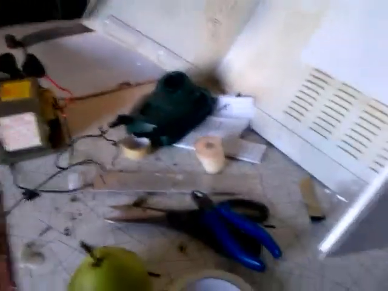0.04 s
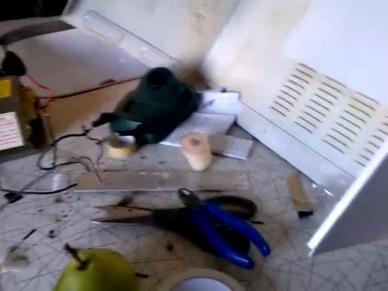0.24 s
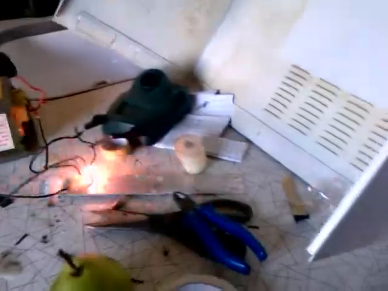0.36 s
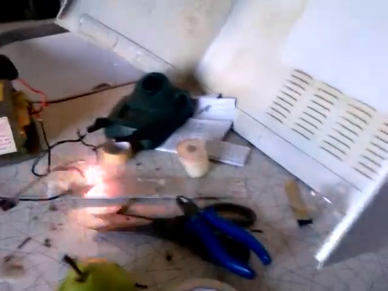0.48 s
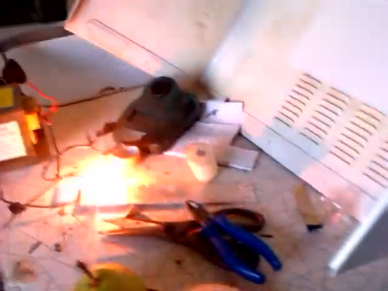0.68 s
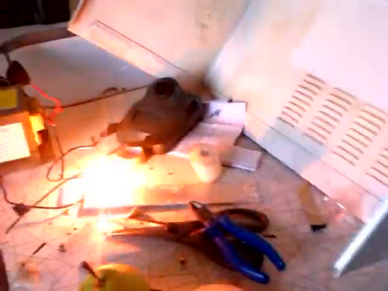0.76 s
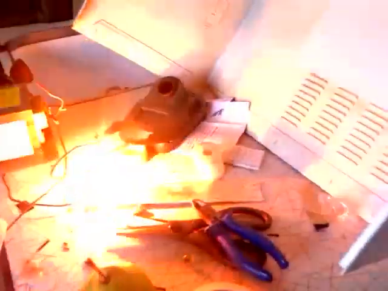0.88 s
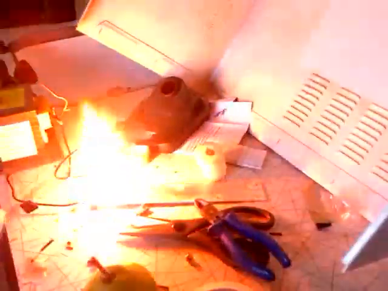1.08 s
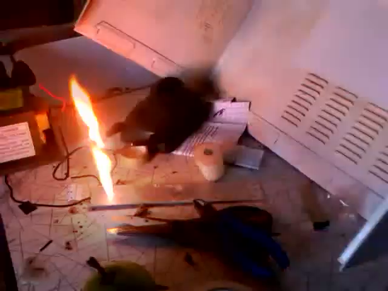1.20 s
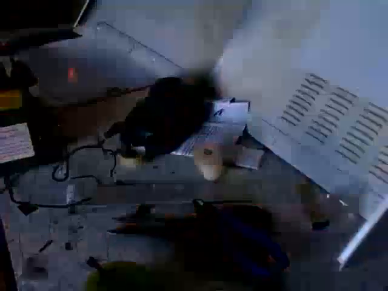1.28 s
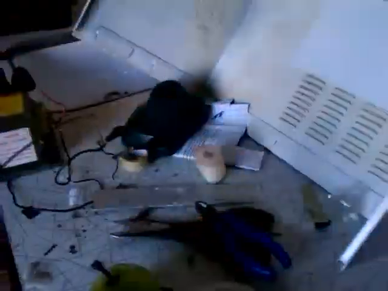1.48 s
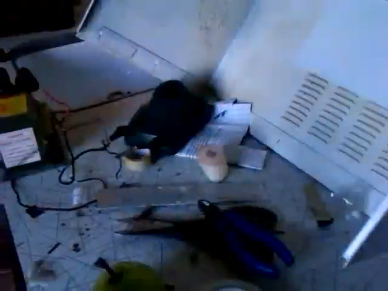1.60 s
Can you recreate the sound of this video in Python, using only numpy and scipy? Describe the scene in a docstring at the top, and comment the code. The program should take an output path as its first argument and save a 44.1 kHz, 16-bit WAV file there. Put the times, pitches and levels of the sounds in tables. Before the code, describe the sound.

An electric arc buzzes close by on a workbench in a small room. Over a faint whine, a switch clacks and rattles at 0.2 seconds. At 0.4 the arc strikes with a bright snap, buzzing harshly and spitting sparks. Another clack comes at 0.8 as it swells into a humming roar. Rapid sharp cracks run from 1.1 until it dies at 1.3 with a low puff, the hum fading briefly.

```python
"""A small room, close to a workbench with a high-voltage arc. Over a faint whine a switch clacks and
rattles, then the arc strikes with a bright snap. It re-ignites in every half-cycle, so it buzzes at
twice the mains rate, spitting sparks. It swells into a humming, roaring flame, cracks on about every
other half-cycle as it stretches, and goes out with a low puff; the room rings on briefly."""
import sys
import numpy as np
from scipy import signal
from scipy.fft import rfft, irfft, next_fast_len
from scipy.io import wavfile

SR = 44100
rng = np.random.default_rng(int(sys.argv[2]) if len(sys.argv) > 2 else 0)


def int16_out(signal):
    """Quantize to a 16-bit WAV file."""
    q = np.round(np.clip(np.atleast_2d(signal).T, -1, 1) * 32767)
    wavfile.write(sys.argv[1], SR, q.astype(np.int16))


N = 72765

# The bed of room noise. Each row: frequency in Hz, relative level in dB.
ROOM_TONE_EQ = [(15, 16), (25, -8.5), (108, -4.5), (157, -9), (195, -4.5), (463, -5.5), (775, -11.5),
                (1940, -18), (2610, -14.5), (3160, -18.5), (5730, -21), (13200, -32), (16000, -115)]
# Thin tones in that bed. Each row: pitch in Hz, level in dB.
WHINE_TONES = [(2573, -70), (5642, -68)]
# Clacks of switch and apparatus. Each row: start in seconds, level in dB, tilt in dB per octave.
CLACK_HITS = [(0.2201, -3, 2), (.2415, -15, 7), (.304, -11, 1.5), (0.4116, -3, 3), (.8295, -3.5, 1)]
# The rattle after the first clack. Each row: time in seconds, level in dB.
RATTLE_FADER = [(.222, -29.5), (.26, -38), (.305, -33), (.33, -42), (.37, -42.5), (.41, -52)]
# The switch's ringing metal. Each row: pitch in Hz, width in Hz, relative level in dB.
SWITCH_MODES = [(585, 167, -6), (798, 100, -0.5), (1205, 280, -3), (1960, 220, -6), (2930, 280, -2.5),
                (3790, 117, 3.5), (5020, 150, -9.5), (5800, 140, -8), (7110, 103, 1.5), (8660, 31, -5),
                (11080, 150, -19)]
# The room's tail. Each row: frequency in Hz, seconds to fall 60 dB.
ROOM_DECAY = [(150, 0.72), (320, 0.34), (1000, 0.49), (6000, 0.38), (14000, 0.37)]
# The first spark's bright tone. Each row: frequency in Hz, relative level in dB.
SNAP_EQ = [(1000, -29), (3500, 7), (5000, -14), (6800, 7), (8500, -4), (12000, -16), (14500, -5),
           (15800, -9)]
# The re-ignition buzz. Each row: multiple of twice the mains rate, relative level in dB.
BUZZ_PARTIALS = [(1, -16.5), (2, -16), (3, -6.5), (4, -16), (5, -40), (6, -6), (7, -9), (8, -9.5),
                 (9, -11.5), (10, -3), (11, -0.5), (12, 5), (13, 4), (14, -0.5), (15, 2), (16, 2.5),
                 (17, 2), (18, 4.5), (19, -6), (20, 0.5), (21, -1.5)]
# The buzz's rise and fall. Each row: time in seconds, level in dB.
BUZZ_FADER = [(.41, -45), (.46, -40), (.55, -39), (.9, -38.5), (1.05, -38), (1.15, -42.5), (1.3, -51)]
# The sparks' ebb and flow. Each row: time in seconds, level in dB.
SPARK_FADER = [(.41, -37.5), (.44, -34), (.48, -34), (.52, -39), (.58, -41.5), (.65, -38), (.73, -41.5),
               (.81, -37.5), (.85, -33), (.92, -35), (.96, -32), (1.02, -30.5), (1.06, -32), (1.12, -35.5),
               (1.2, -36), (1.31, -34.5)]
# The sparks' sizzle. Each row: frequency in Hz, relative level in dB.
SPARK_EQ = [(400, -24.5), (1500, -12), (2600, -13.5), (3600, -5.5), (5000, -3.5), (6000, -4.5), (6600, 1),
            (7400, -1), (8100, -8), (9500, -9), (12000, -20.5), (14000, -20), (15800, -23)]
# The flame's swell. Each row: time in seconds, roar level in dB, growl level in dB.
FLAME_FADERS = [(.5, -60, -79), (0.701, -51.5, -58), (.82, -39, -48), (.92, -48, -44.5), (1.03, -48, -37),
                (1.09, -30, -36), (1.16, -33, -29), (1.22, -34, -28), (1.3, -33.5, -35)]
# The flame's overtones. Each row: multiple of the mains rate, relative level in dB.
GROWL_PARTIALS = [(4, -11.5), (6, -11), (8, 3), (9, -3), (12, 2.5), (14, -0.5), (15, 9), (16, -2),
                  (22, -5.5), (23, -8), (26, -7), (27, -3)]
# The body of the roar. Each row: frequency in Hz, relative level in dB.
ROAR_EQ = [(60, -22), (150, -12), (220, -7), (300, -5.5), (420, -8.5), (700, 0), (950, -6.5), (1400, -5.5),
           (2200, -8), (2900, -9), (3600, -9), (6000, -9.5), (12000, -60)]
# The deep hum, which lingers after the flame. Each row: time in seconds, level in dB.
HUM_FADER = [(0.62, -72), (0.654, -84), (0.71, -58), (1.162, -31.5), (1.288, -31.5), (1.37, -43),
             (1.46, -47.5), (1.54, -61), (1.65, -64)]
# The stretched arc's cracks. Each row: start in seconds, level in dB, tilt in dB per octave.
CRACK_HITS = [(1.0694, -2.5, 0), (1.0888, 0, 0.5), (1.1368, -6.5, -2), (1.1508, 0.5, 7), (1.19, 1, -3),
              (1.2117, -10, -9), (1.2292, 3, -2), (1.2504, 2, -1.5), (1.2698, 1, -3), (1.289, -5.5, -5)]
# The tone of a crack. Each row: frequency in Hz, relative level in dB.
CRACK_EQ = [(100, -13.5), (400, 8), (800, -0.5), (1400, 7.5), (2300, -4.5), (3600, 6.5), (5000, -9.5),
            (7000, 1), (10000, -27), (15000, -41)]
# Low resonances under the last puff. Each row: pitch in Hz, width in Hz, relative level in dB.
PUFF_MODES = [(91, 40, -7), (185, 50, -6.5), (308.3, 23, 3), (379, 72, -0.5)]

MAINS_HZ, TOP_HZ = 50, 15800
STRIKE_S, OUT_S, QUENCH_S = .41, 1.305, .019  # the arc lights, starts to go out, and fades this long
IGNITION_S = .00196  # where the re-ignition falls in each half-cycle
TIME = np.arange(N) / SR


def amp(db):
    """Decibels to gain."""
    return 10 ** (np.asarray(db) / 20)


def unit(x):
    """Scale to rms 1."""
    return x / np.sqrt(np.mean(x ** 2) + 1e-20)


def fader(rows):
    """Ride a gain through points of seconds and dB."""
    return amp(np.interp(TIME, *np.transpose(rows)))


def along(points, hz):
    """Read a curve on a log frequency axis."""
    freqs, values = np.transpose(points)
    return np.interp(np.log(hz + 1), np.log(freqs + 1), values)


def through(x, response):
    """Play x through an impulse response."""
    return signal.fftconvolve(x, response)[:N]


def colour(points, tilt_db=0, size=4096):
    """An EQ curve as a minimum-phase response of energy 1."""
    hz = np.fft.rfftfreq(size, 1 / SR)
    curve_db = along(points, hz) + tilt_db * np.log2(np.maximum(hz, points[0][0]))
    cepstrum = irfft(np.log(amp(curve_db)))
    cepstrum[1:size // 2] *= 2
    cepstrum[size // 2 + 1:] = 0
    response = irfft(np.exp(rfft(cepstrum)))
    return response / np.linalg.norm(response)


def ring(modes, tilt_db=0, size=8192):
    """A bank of resonances as a response of energy 1."""
    hz = np.fft.rfftfreq(size, 1 / SR)
    spectrum = 0
    for k, (pitch, width, db) in enumerate(modes):
        resonance = 1j * hz * width / (pitch ** 2 - hz ** 2 + 1j * hz * width)
        spectrum += (-1) ** k * amp(db + tilt_db * np.log2(pitch)) * resonance
    response = irfft(spectrum)
    return response / np.linalg.norm(response)


def burst(t60_s):
    """A dying burst of noise of energy 1."""
    t = TIME[:SR // 10]
    noise = rng.standard_normal(len(t)) * amp(-60 * t / t60_s)
    return noise / np.linalg.norm(noise)


def add(track, start_s, x):
    """Drop x onto the track."""
    part = track[round(start_s * SR):][:len(x)]
    part += x[:len(part)]


def burning():
    """A gate, open while the arc is alight."""
    return (TIME > STRIKE_S) * np.clip(1 - (TIME - OUT_S) / QUENCH_S, 0, 1)


def surges(lag_s, fall_s, trough):
    """A surge that dies away in each half-cycle."""
    age_s = (TIME - lag_s) % (.5 / MAINS_HZ)
    return unit(trough + np.exp(-age_s / fall_s))


def flutter(depth_db, lag_s):
    """A new random gain for each half-cycle."""
    half_cycle = ((TIME - lag_s) * 2 * MAINS_HZ + 1).astype(int)
    return amp(rng.uniform(-1.37 * depth_db, depth_db, N))[half_cycle]


def pulses(partials, hz, scatter_rad):
    """A steady pulse train, smeared by scattering the phases of its partials."""
    phase = 2 * np.pi * hz * (TIME - IGNITION_S)
    return sum(amp(db) * np.cos(k * phase + scatter_rad * rng.standard_normal()) for k, db in partials)


def hiss(response):
    """Steady coloured noise of rms 1."""
    return unit(signal.fftconvolve(rng.standard_normal(N + len(response) - 1), response, "valid"))


def room_tone():
    """A soft noise bed and a thin whine, with a narrow hiss near its upper tone."""
    bed = amp(-56) * hiss(colour(ROOM_TONE_EQ))
    halo = amp(-65.5) * hiss(ring([(5800, 140, 0)]))
    whine = sum(amp(db) * np.sqrt(2) * np.sin(2 * np.pi * hz * TIME) for hz, db in WHINE_TONES)
    return bed + halo + whine


def switch(rattles_per_s=1500, contact_top_hz=7800):
    """Clacks and a rattle of small contacts ring the same metal parts."""
    metal = np.zeros(N)
    for start_s, db, tilt_db in CLACK_HITS:
        add(metal, start_s, amp(db) * through(burst(t60_s=.013), ring(SWITCH_MODES, tilt_db)))
    contacts = rng.choice([-1, 1], N) * (rng.random(N) < rattles_per_s / SR)
    rattling = (TIME > CLACK_HITS[0][0]) & (TIME < STRIKE_S)
    metal += through(unit(contacts) * fader(RATTLE_FADER) * rattling, ring(SWITCH_MODES))
    return signal.sosfilt(signal.butter(2, contact_top_hz, fs=SR, output="sos"), metal)


def room(x, direct, bloom_s=.0021, walls_t60_s=.038):
    """Direct sound, quick reflections off bench and walls, and the room's tail."""
    hz, frame_s, bands = signal.stft(rng.standard_normal(SR // 2), SR, nperseg=256)
    decay = amp(-60 * frame_s / along(ROOM_DECAY, hz)[:, None])
    tail = signal.istft(bands * decay, SR, nperseg=256)[1]
    t = np.arange(len(tail)) / SR
    tail *= 1 - np.exp(-t / bloom_s)
    walls = rng.standard_normal(len(t)) * amp(-60 * t / walls_t60_s) * (t > .001)
    response = amp(-2.5) * tail / np.linalg.norm(tail) + amp(-3.5) * walls / np.linalg.norm(walls)
    response[0] = direct
    return through(x, response / np.linalg.norm(response))


def snap():
    """The first spark lights the arc with a short, bright burst."""
    track = np.zeros(N)
    add(track, STRIKE_S, amp(-6) * through(burst(t60_s=.013), colour(SNAP_EQ)))
    return track


def buzz(split_hz=950, thin_db=-2.5, filled_s=.96):
    """The arc re-ignites in every half-cycle; its low end starts thin and fills out as it grows."""
    hz = 2 * MAINS_HZ
    low = pulses([(k, db) for k, db in BUZZ_PARTIALS if k * hz <= split_hz], hz, scatter_rad=.6)
    high = pulses([(k, db) for k, db in BUZZ_PARTIALS if k * hz > split_hz], hz, scatter_rad=.6)
    filling = fader([(STRIKE_S, thin_db), (filled_s, 0)])
    tone = (filling * low + high) / np.std(low + high)
    return tone * flutter(depth_db=.5, lag_s=0) * fader(BUZZ_FADER) * burning()


def sparks(per_s=5400, spread_db=3, lag_s=.0063):
    """Tiny random discharges crowd into uneven spits at the current peaks."""
    hits = rng.random(N) < per_s / SR
    sizes = rng.choice([-1, 1], N) * amp(spread_db * np.minimum(rng.exponential(size=N), 3))
    spits = flutter(depth_db=2, lag_s=lag_s) * surges(lag_s, fall_s=.0018, trough=.35)
    return through(unit(hits * sizes * spits) * fader(SPARK_FADER) * burning(), colour(SPARK_EQ))


def roar():
    """The flame's rush of noise, pulsing with the current."""
    swell = fader([(s, db) for s, db, _ in FLAME_FADERS]) * burning()
    pulsing = surges(lag_s=.0076, fall_s=.0016, trough=.2)
    return through(swell * pulsing * rng.standard_normal(N), colour(ROAR_EQ))


def growl(lopsided_s=1.184, fade_in_s=.06):
    """The hot column throbs; odd overtones creep in as the two half-cycles begin to differ."""
    swell = fader([(s, db) for s, _, db in FLAME_FADERS]) * burning()
    even = pulses([(k, db) for k, db in GROWL_PARTIALS if k % 2 == 0], MAINS_HZ, scatter_rad=1.35)
    odd = pulses([(k, db) for k, db in GROWL_PARTIALS if k % 2 == 1], MAINS_HZ, scatter_rad=1.35)
    lopsided = np.clip((TIME - lopsided_s) / fade_in_s, 0, 1)
    return swell * (even + lopsided * odd) / np.std(even + odd)


def hum():
    """The flame's low end: a pure tone at twice the mains rate."""
    return fader(HUM_FADER) * unit(pulses([(2, 0)], MAINS_HZ, scatter_rad=0))


def cracks(suction=.46, gap_s=.00034, sputter_db=-5):
    """The stretched arc breaks down anew in sharp reports: a push, a suction, a brief sputter."""
    track = np.zeros(N)
    for start_s, db, tilt_db in CRACK_HITS:
        push = amp(db) * colour(CRACK_EQ, tilt_db) / np.hypot(1, suction)
        add(track, start_s, push)
        add(track, start_s + gap_s, -suction * push)
        add(track, start_s + 2 * gap_s, amp(sputter_db) * through(burst(t60_s=.038), push))
    return track


def puff(peak_s=1.296, half_length_s=.021):
    """The flame collapses in a soft whump that stirs low resonances."""
    swell = amp(-33.5) * np.exp(-((TIME - peak_s) / half_length_s) ** 2)
    return through(swell * rng.standard_normal(N), ring(PUFF_MODES))


def scene():
    """The mono mix: hits and noisy layers go through the room; tones and the bed stay dry."""
    mix = room(switch(), direct=.79)
    mix += buzz() + room(sparks(), direct=1.14)
    mix += growl() + room(roar() + puff(), direct=.9) + hum()
    mix += room(snap() + cracks(), direct=1.5)
    return (mix + room_tone())[None]


def record(dry):
    """A brick-wall high cut on the whole mix."""
    size = next_fast_len(N + SR // 2)
    passband = np.fft.rfftfreq(size, 1 / SR) < TOP_HZ
    return irfft(rfft(dry, size) * passband, size)[..., :N]


dry = scene()
out = record(dry)
int16_out(out)
```